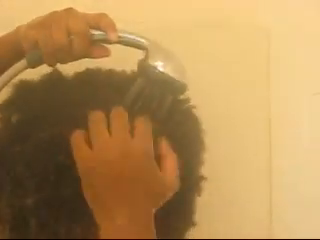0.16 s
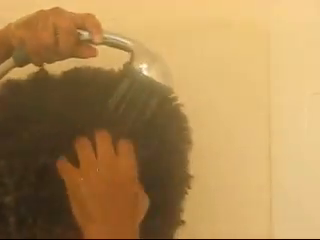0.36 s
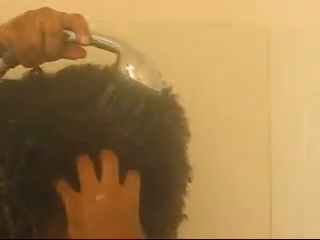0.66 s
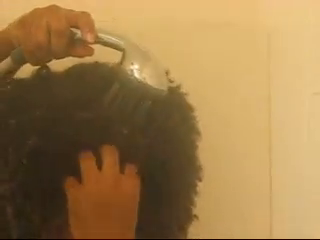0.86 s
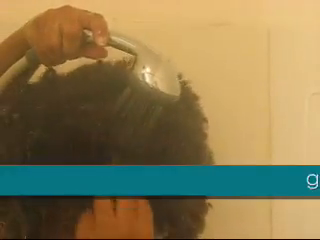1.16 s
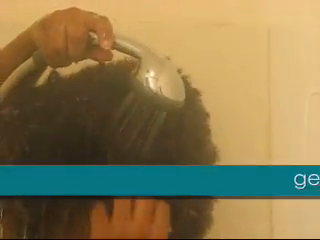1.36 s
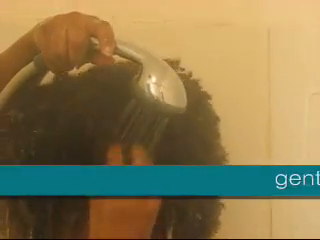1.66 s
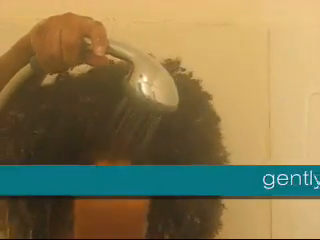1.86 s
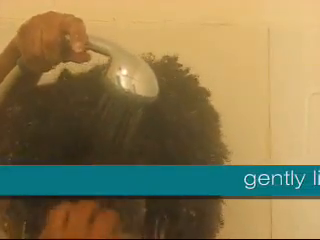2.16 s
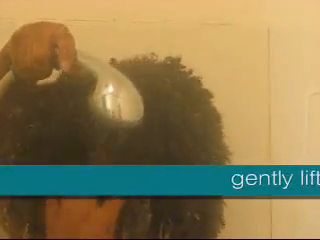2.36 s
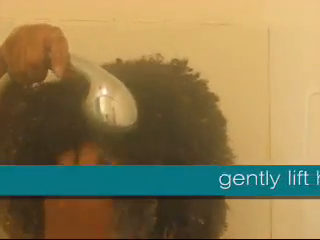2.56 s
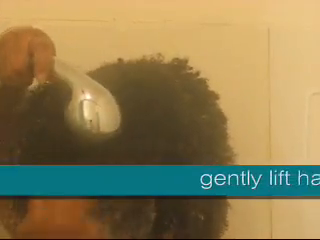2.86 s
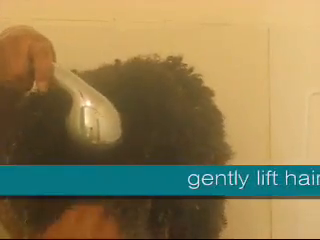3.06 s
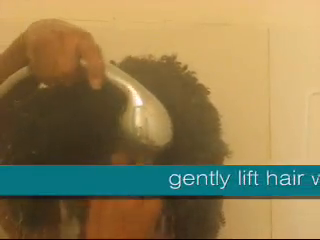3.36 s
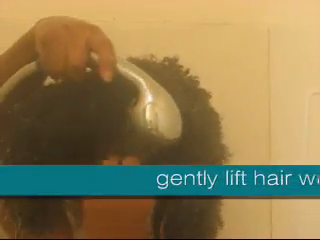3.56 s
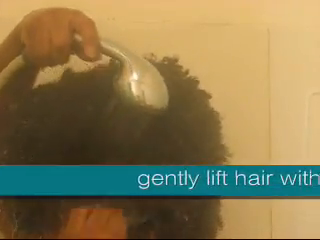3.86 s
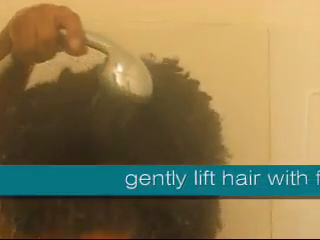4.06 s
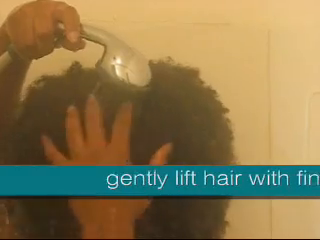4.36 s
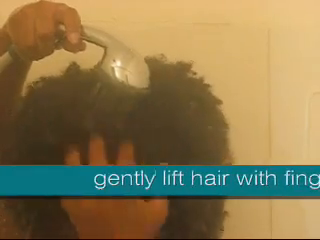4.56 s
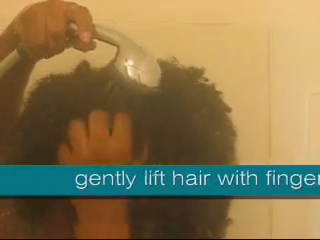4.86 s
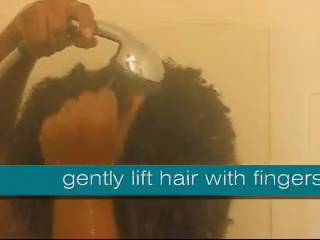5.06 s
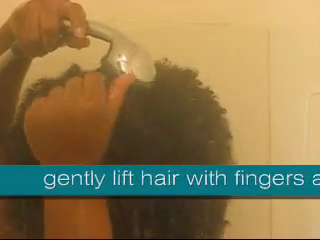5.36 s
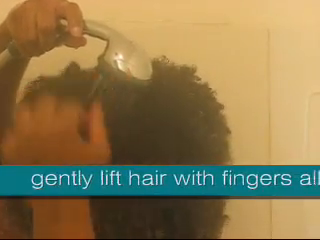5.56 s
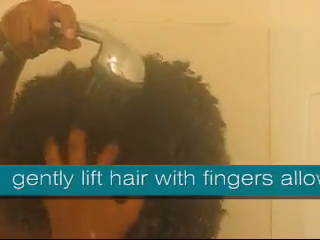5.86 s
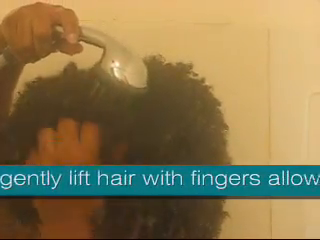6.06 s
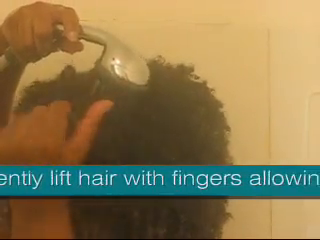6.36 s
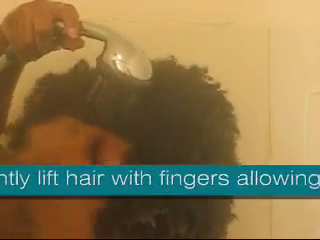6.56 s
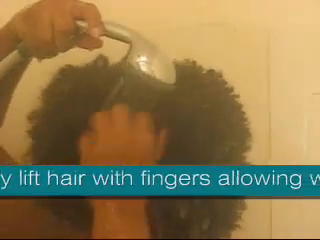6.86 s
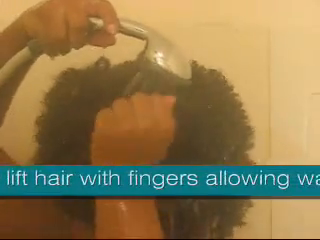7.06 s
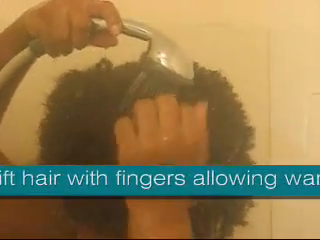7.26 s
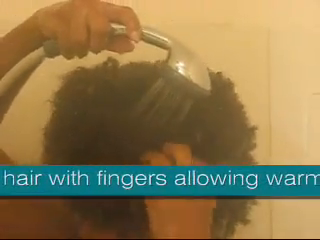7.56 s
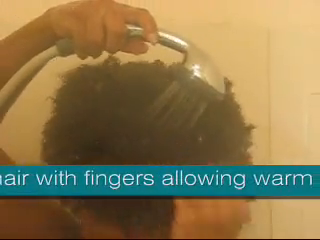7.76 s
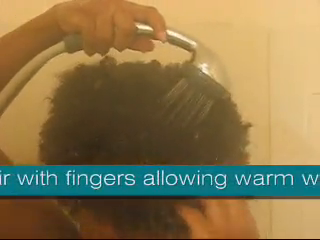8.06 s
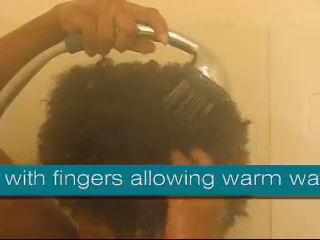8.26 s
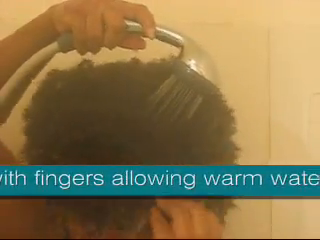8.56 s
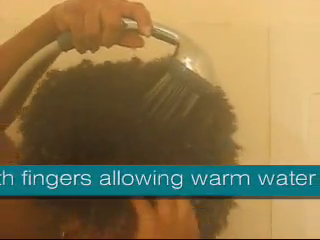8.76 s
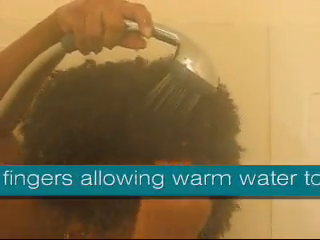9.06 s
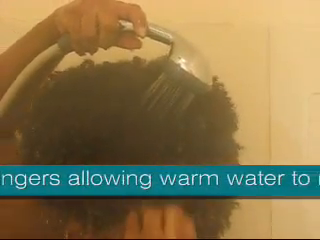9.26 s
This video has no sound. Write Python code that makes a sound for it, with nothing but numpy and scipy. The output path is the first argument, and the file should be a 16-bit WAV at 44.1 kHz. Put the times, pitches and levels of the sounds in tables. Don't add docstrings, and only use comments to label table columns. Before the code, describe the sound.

In a small tiled bathroom, a handheld shower sprays steadily into thick hair. Runoff patters and falls in crisp, irregular splats onto a tub that drums softly underneath. It starts splashy, thins to trickles, surges into dense splashing, eases around six seconds, then bursts again. A small close microphone overloads slightly on the loudest splats, with dull treble and soft bumps near the end.

```python
import sys
import numpy as np
from scipy import signal
from scipy.fft import rfft, irfft, next_fast_len
from scipy.io import wavfile
from scipy.ndimage import uniform_filter1d

SR = 44100
rng = np.random.default_rng(int(sys.argv[2]) if len(sys.argv) > 2 else 0)


def log_audio(samples):
    frames = np.atleast_2d(samples).T
    limited = np.clip(frames, -1, 1)
    pcm = np.round(limited * 32767).astype(np.int16)
    wavfile.write(sys.argv[1], SR, pcm)


def rack_gain(trim_db):
    fader = np.asarray(trim_db, float)
    return 10 ** (fader / 20)


N = 414423
SPOTS = 5


def unit(x):
    return x / np.sqrt(np.mean(x ** 2) + 1e-20)


def in_time(rows):
    s, *columns = np.transpose(rows)
    return [np.interp(np.arange(N) / SR, s, column) for column in columns]


def at_hz(points, hz):
    known_hz, values = np.array(points).T[:2]
    return np.interp(np.log(np.maximum(hz, 1)), np.log(known_hz), values)


def colour(x, gain_of_hz):
    size = next_fast_len(x.shape[-1])
    hz = np.arange(size // 2 + 1) * SR / size
    return irfft(rfft(x, size) * gain_of_hz(hz), size)[..., :x.shape[-1]]


def resonance(x, hz, width_hz):
    r = np.exp(-np.pi * width_hz / SR)
    gain = (1 - r * r) / 2
    return signal.lfilter([gain, 0, -gain], [1, -2 * r * np.cos(2 * np.pi * hz / SR), r * r], x)


def drift(rate_hz):
    r = np.exp(-80 * np.pi * rate_hz / SR)
    slow = signal.lfilter([1], [1, -2 * r, r * r], rng.standard_normal(N // 40 + 2002))[2000:]
    return np.interp(np.arange(N) / 40, np.arange(len(slow)), unit(slow))


def stereo(mid, side):
    # frequency_hz, left_right_likeness
    coherence = [(60, 0.93), (300, 1), (700, 0.89), (1300, 0.55), (2300, 0.21), (3500, 0.45), (6000, 0.5)]
    alike = lambda hz: np.clip(at_hz(coherence, hz), 0, 1)
    mid = colour(mid, lambda hz: np.sqrt(.5 + .5 * alike(hz)))
    side = colour(side, lambda hz: np.sqrt(.5 - .5 * alike(hz)))
    return np.array([mid + side, mid - side])


def runoff():
    # time_s, flow_db, drop_weight_db
    flow_rows = [(0.0, -16.5, 4), (0.23, -16, -2), (0.6, -22, -1.5), (1.28, -26.5, 0.5), (1.54, -21, 2.5),
                 (1.75, -27, 0), (2.33, -23.5, 0), (2.88, -13.5, -2.5), (4.06, -13.5, -0.5),
                 (5.78, -19.5, -2.5), (5.99, -32, 4.5), (6.25, -27, 0), (6.67, -16.5, -2.5),
                 (7.64, -15, -1), (7.77, -18, -5), (8.64, -22, 0.5), (8.84, -17.5, -8.5), (9.4, -22, 1.5)]
    # peak_s, gain_db, length_s
    squeezes = [(0.218, 2.5, 0.23), (0.65, 1.5, 0.062), (2.1, -1, 0.051), (2.708, 3.5, 0.067),
                (3.08, 1, 0.19), (3.47, 0.5, 0.2), (3.882, -3.5, 0.063), (4.203, 2, 0.047),
                (4.455, 1, 0.061), (4.658, 2.5, 0.1), (5.252, -7, 0.047), (5.532, 3, 0.13),
                (6.455, 5, 0.087), (6.91, -0.5, 0.017), (7.393, 2.5, 0.046), (7.687, 5, .1),
                (7.92, -3, .05), (8.525, -2.5, 0.046), (8.635, 6.5, 0.048), (9.055, 5.5, 0.1),
                (9.347, 4, 0.12)]
    # mean_level_db, share of the flow's swing, share of the weight, share of a gush
    layers = [(-32, 0.12, .3, 1.1),
              (-26.5, 0.95, 2, 1.23),
              (-18, 0.94, 0.1, 0.92),
              (-23.5, 0.42, 0.32, 1)]
    flow_db, weight_db = in_time(flow_rows)
    t = np.arange(0, N + 64, 64) / SR
    gush_db = 0
    for s, db, length in squeezes:
        width = length * np.where(t < s, 0.57, 1)
        gush_db = gush_db + db * np.exp(-((t - s) / width) ** 2)
    gush_db = np.interp(np.arange(N) / SR, t, gush_db)
    return [db + swing * (flow_db - flow_db.mean()) + heavy * weight_db + surge * gush_db
            for db, swing, heavy, surge in layers]


def splats(trim_db, climb, attack_share, ragged_db):
    # start_s, level_db, pitch_hz, t60_s (limited
    gobs = [(.387, -10.5, 4130, .2), (1.4214, -10.5, 3490, 0.5), (1.924, -12.5, 2830, 0.6),
            (2.005, 2.5, 3166, 0.2), (2.238, -14, 4100, 0.6), (2.679, -4.5, 3105, 0.1),
            (2.744, -4.5, 3960, .15), (2.989, -5, 4190, .2), (3.228, -2, 3560, .4),
            (3.365, -2, 3516, -0.5), (3.797, -6, 4290, .15), (3.965, -0.5, 3934, 3),
            (4.041, -2, 3924, 0), (4.173, -2.5, 4196, 0.5), (4.837, -1.5, 3960, 0.5),
            (4.958, -5, 4210, 0.4), (5.355, -5, 2700, 0.5), (5.45, -6.5, 3630, .5),
            (5.516, -6, 2754, 0.7), (5.555, -2, 4175, 0.2), (6.46, -6, 3315, 2),
            (6.661, -5, 4210, 0.2), (6.762, -5, 2920, .3), (7.014, -12, 3050, -0.6),
            (8.227, -8.5, 3324, 0.4), (8.291, -9, 3930, 0), (8.898, -4.5, 4226, 0.8),
            (8.946, -3, 3090, 0.25), (8.975, -5.5, 2900, 0.25), (9.04, -4, 2410, 0.24),
            (.095, -1, 5160, 0.37), (0.275, -5.5, 5130, 0.41), (1.614, -8, 4940, 0.25),
                   (2.386, -9, 4510, 0.36), (2.645, -4.5, 4530, 0.29), (3.139, -4.5, 5250, 0.78),
                   (3.304, -1, 5110, 0.34), (3.723, -3.5, 5170, 0.1), (3.928, 1.5, 5120, 0.34),
                   (4.623, 0, 5250, .3), (4.763, -5, 4880, 0.14), (4.787, -3.5, 5420, .55),
                   (5.097, -4, 4910, 0.38), (5.466, -5.5, 5520, .4), (5.786, -9.5, 4480, .3),
                   (5.905, -10.5, 5620, 0.36), (6.475, -2.5, 5610, .59), (6.742, 1, 5745, 0.6),
                   (6.728, -3, 5320, .3), (6.942, -5, 4550, .3), (7.143, 2.5, 5360, 0.23),
                   (7.335, -3.5, 4824, 0.68), (7.52, -3.5, 5550, 0.36), (7.639, 0.5, 5570, 0.67),
                   (7.704, -1.5, 4830, 0.31), (7.969, -9.5, 5220, 0.27), (8.066, -10.5, 5040, 0.24),
                   (8.253, -3.5, 5230, 0.44), (8.664, -4, 5380, 0.33), (9.047, 1.5, 4500, 0.26),
                   (9.31, -6.5, 5310, 0.27),
            (.178, 1.5, 5840, 0.21), (.613, -11.5, 6360, 0.22), (.963, -8.5, 6940, 0.35),
                  (1.511, -8, 5920, .15), (1.661, -10.5, 6820, 0.31), (2.012, -2.5, 6990, 0.3),
                  (2.181, -7, 6500, 0.26), (2.419, -6, 6040, 0.38), (2.792, -5, 5870, 0.33),
                  (2.938, -4, 6400, 0.33), (2.989, 2.5, 6550, 0.25), (3.274, 0.5, 6840, .55),
                  (3.478, -1, 6730, .48), (3.763, 0, 5570, 0.14), (4.055, 1, 6910, 0.28),
                  (4.137, -0.5, 6770, .55), (4.334, 0.5, 5930, 0.42), (5.321, -12, 6030, 0.44),
                  (5.585, -3, 6190, 0.14), (5.646, -5.5, 6480, 0.11), (6.839, 0, 5920, 0.15),
                  (7.064, -4.5, 5910, 0.27), (7.115, -0.5, 6410, 0.34), (7.459, -1.5, 6010, 0.15),
                  (8.148, -6.5, 6360, 0.45), (8.602, -10, 5260, 0.23), (8.64, -3, 7410, 0.19),
                  (8.836, -8.5, 6920, 0.36), (9.015, -4.5, 7030, 0.65), (9.364, 0, 6550, 0.29)]
    # start_s, level_db, pitch_hz
    drip_rows = [(0.05, -22, 5700), (.13, -5, 4810), (.432, -10, 6900), (.685, -20, 5200),
                 (.819, -12, 6870), (.998, -17, 4200), (1.036, -11, 7350), (1.311, -16, 3830),
                 (1.366, -12, 6370), (1.585, -11, 4500), (1.701, -13.5, 6340), (1.97, -16, 4020),
                 (2.141, -13.5, 6400), (2.478, -9, 6940), (2.529, -13, 4770), (2.595, -8, 6400),
                 (3.17, -8.5, 5160), (3.559, -2, 7420), (3.627, -9, 5270), (3.899, -5.5, 5940),
                 (4.28, -9.5, 4150), (5.059, -14, 4860), (6.238, -14, 6370), (6.41, -10, 5300),
                 (6.989, -7, 5510), (7.364, -10, 6000), (7.899, -15, 4160), (8.194, -9, 5020),
                 (8.804, -17, 6470), (9.262, -7, 7030)]
    # start_s, level_db, pitch_hz, t60_s (limited
    further_gobs = [(1.215, -19.5, 3100, -0.2), (1.617, -14, 3900, .3), (3.43, -8, 3286, 3),
                    (3.52, -2, 3600, -0.47), (4.115, -7, 4330, 1), (4.2, -4, 6500, -0.9),
                    (4.24, -10, 4200, .4), (5.36, -2, 4800, 0.1), (6.945, -3.5, 6800, .2),
                    (7.97, -8, 3085, -0.3), (7.975, -7.5, 7520, 0.5), (8.031, -27, 3170, -1),
                    (8.81, -9, 6820, .2), (8.868, -8, 7140, .25), (6.789, -13, 2780, .4), (4.96, -8, 7580, 1),
                    (5.062, -12, 7200, 0.5), (5.098, -6.5, 7860, 0.5), (5.12, -8, 4700, 0),
                    (5.165, -9, 7280, -0.5), (8.197, -10, 7500, 1.3), (8.258, -8, 7320, 0.5),
                    (6.985, -11, 4290, .25), (.935, -14, 4820, 0), (1.165, -16, 5200, .2),
                    (7.79, -11, 6020, 0)]
    # start_s, level_db, pitch_hz
    slap_rows = [(0.185, 3, 4510), (0.281, -2, 4200), (1.4217, 1.5, 3480), (1.6182, -1, 5260),
                 (1.6641, -5, 6170), (3.147, -4, 4480), (3.2326, 7, 4640), (3.4885, 4, 7000),
                 (3.8026, 3, 4640), (4.044, 4, 4180), (4.3358, 4, 6080), (4.7636, -2, 4870),
                 (4.8355, 7, 5660), (4.9661, -2, 3550), (5.0983, 0, 5020), (5.3623, -3.5, 2510),
                 (5.4734, 0, 6450), (5.5196, 7, 3450), (5.6494, -8, 6600), (6.6677, -0.5, 5820),
                 (6.7468, 6, 5180), (6.9496, 0, 4070), (7.0683, 0, 5860), (7.1404, 6, 5420),
                 (7.3682, 5, 5020), (7.71, 3, 4020), (7.7624, 3, 6660), (7.9714, 0.5, 7130),
                 (8.0691, -2, 6130), (8.1496, -1, 6000), (8.1953, 0, 6020), (8.2327, 6, 6640),
                 (8.2967, 0, 4420), (8.6047, -1, 5880), (8.6687, 4, 6280), (8.867, -1, 6600),
                 (8.9144, -3, 4080), (8.9535, 3.5, 3080), (8.9776, 5.5, 2910), (9.0193, -3, 6520),
                 (9.3127, 4.5, 7090)]
    drips = [(s, db, hz, 0.29) for s, db, hz in drip_rows]
    slaps = [(s - .0008, db - 6, hz, 0.074) for s, db, hz in slap_rows]
    out, t = np.zeros((2, N + SR)), np.arange(SR // 4) / SR
    mist_filter = signal.butter(2, 6500, "high", fs=SR, output="sos")
    for s, level_db, hz, t60 in gobs + drips + further_gobs + slaps:
        octaves = 0.8 + 0.28 * np.log2(hz / 5000) + 0.0048 * (level_db + 4.5)
        noise = rng.standard_normal((3, 2, len(t)))
        r = np.exp(-np.pi * 1.6 * hz * np.clip(octaves, .08, 1.5) * np.log(2) / SR)
        flutter = signal.lfilter([1], np.poly([r, r, r]), noise[0] + 1j * noise[1])
        pitch_hz = hz * (1 + climb * (1 - np.exp(-t / 0.02995)))
        body = unit(np.real(flutter * np.exp(2j * np.pi * np.cumsum(pitch_hz) / SR)))
        body = body + rack_gain(-6) * unit(signal.sosfilt(mist_filter, noise[0]))
        roughness = unit(uniform_filter1d(noise[2, 0], size=160))
        ragged = rack_gain(ragged_db * roughness * np.exp(-t / 0.095))
        t60 = np.clip(t60, .05, .6)
        attack = 1 - np.exp(-t / (attack_share * t60))
        fade = rack_gain(-60 * t / t60) * np.cos(2 * np.pi * t) * attack
        start = round(s * SR)
        out[:, start:start + len(t)] += rack_gain(level_db + trim_db) * body * ragged * fade
    return stereo(*out[:, :N])


def patter(level_db, low_hz, high_hz, per_s, spread_db, cycles):
    drop_db = np.clip(spread_db, 0, 4.5) * np.minimum(rng.exponential(1, N), 4)
    sizes = rack_gain(drop_db) * rng.choice([-1, 1], N)
    chance, dealt, out = rng.random(N), rng.integers(0, 2 * SPOTS, N), np.zeros((SPOTS, N))
    odds = [per_s * rack_gain(4 * drift(9)) / SR for spot in range(SPOTS)]
    for k, hz in enumerate(np.geomspace(low_hz, high_hz, 2 * SPOTS)):
        lands = (chance < odds[k // 2]) & (dealt == k)
        out[k % SPOTS] += unit(resonance(sizes * lands + 1e-18, hz, 2.18 * hz / cycles))
    return rack_gain(level_db) * unit(out) / np.sqrt(SPOTS)


def plinks():
    # start_s, level_db, pitch_hz, t60_s (limited below)
    lone_drops = [(.695, -17, 5200, -1), (1.935, -13, 2800, -0.7), (2.15, -21, 4650, .15),
                  (2.395, -14, 4260, -0.5), (2.535, -18, 4540, 0.5), (7.018, -12.5, 3070, 0),
                  (7.903, -16.5, 4300, .25), (8.068, -12.5, 4670, -0.5), (8.23, -10.5, 3470, 0.3),
                  (8.605, -13, 5600, -1.3), (8.84, -10.5, 7100, .15), (9.018, -12, 7000, .15)]
    out, t = np.zeros((2, N + SR)), np.arange(SR // 4) / SR
    for s, level_db, hz, t60 in lone_drops:
        width_hz = .14 * hz
        noise = rng.standard_normal((2, len(t)))
        ring = unit(resonance(resonance(noise, hz, width_hz), hz, width_hz))
        start = round(s * SR)
        out[:, start:start + len(t)] += rack_gain(level_db - 60 * t / np.clip(t60, .05, .4)) * ring
    return stereo(*out[:, :N])


def jets(patchy_db):
    # frequency_hz, density_db_per_hz
    hiss_spectrum = [(410, -14), (700, 7), (740, 9), (1310, 3.5), (2570, -15), (7140, 0.5), (8740, -2),
                     (9560, -6), (10200, -14), (13300, -44), (22000, -120)]
    hiss = colour(rng.standard_normal((2, N)), lambda hz: rack_gain(at_hz(hiss_spectrum, hz)))
    out = 0
    for centre in 700 * 2 ** np.arange(0, 4.1, .5):
        def region(hz):
            octaves = np.log2(np.clip(hz, 700, 11200) / centre)
            return np.cos(np.pi * np.clip(octaves, -.5, .5)) ** 2
        out = out + rack_gain(patchy_db * drift(4.2)) * colour(hiss, region)
    return rack_gain(-29.5 + drift(12.0)) * unit(stereo(*out))


def tub(level_db):
    # mode_hz, width_hz, level_db
    mode_rows = [(58.3, 12, -35), (75.7, 10.3, -10), (121, 20, -26), (139.8, 14.4, -5.5), (160.3, 11, -2),
                 (195, 35, -18.5), (219.2, 13.6, 0.5), (249.5, 14.7, 0), (283, 15.6, -1.5),
                 (315, 13.3, -7.5), (346.4, 17.7, -0.5), (373, 18.3, -4.5), (397.8, 14, -2),
                 (438, 18.3, -2.5), (463.7, 20, -5), (503.3, 17.3, -0.5), (552.5, 34, -8.5), (603, 42, -4),
                 (690, 30, -13), (742, 9.1, 1.5), (810, 346, -13.5)]
    # peak_s, level_db, centre_hz, length_s
    boom_rows = [
        (0.252, -28, 216, 0.21),
        (0.69, -33, 330, 0.11),
        (3.098, -30, 430, 0.11),
        (3.5, -39, 258, 0.13),
        (4.202, -31, 150, 0.073),
        (4.795, -54, 580, 0.13),
        (5.496, -37, 330, 0.18),
        (6.47, -29.5, 400, 0.092),
        (7.4, -34, 457, 0.08),
    ]

    def modes(f):
        peak = lambda hz, w: 1.5j * f * w / (hz ** 2 - f ** 2 + 1.5j * f * w)
        return sum(rack_gain(db) * peak(hz, w) ** 2 * (-1) ** k for k, (hz, w, db) in enumerate(mode_rows))

    drum = unit(stereo(*colour(rng.standard_normal((2, N)), modes)))
    out, t = rack_gain(level_db) * drum, np.arange(N) / SR
    for s, db, hz, length in boom_rows:
        near = slice(max(0, int((s - 3 * length) * SR)), int((s + 3 * length) * SR))
        swell = np.exp(-((t[near] - s) / length) ** 2)
        out[:, near] += rack_gain(db) * unit(resonance(drum[:, near], hz, .4 * hz)) * swell
    return out


def tiles(x, direct_db, build_s):
    # frequency_hz, t60_s
    decay_times = [(300, 0.71), (2000, 0.31), (5000, 0.22), (9000, 0.064)]
    t, edges, tail = np.arange(SR // 2) / SR, 400 * 2 ** np.arange(0, 5.1, .5), 0
    for low, high in zip(edges, edges[1:]):
        white = rng.standard_normal((2, SPOTS, len(t)))
        band = signal.sosfilt(signal.butter(2, [low, high], "band", fs=SR, output="sos"), white)
        t60 = at_hz(decay_times, np.sqrt(low * high))
        early = (1 + 0.66 * np.exp(-t / 0.0072)) * (1 - np.exp(-t / build_s))
        tail = tail + band * rack_gain(-60 * t / t60) * early / np.sqrt(t60)
    tail = tail / np.sqrt(np.sum(tail ** 2, axis=2, keepdims=True))
    tail[..., 0] += rack_gain(direct_db)
    x = np.hstack([x[:, SR // 4:0:-1], x])
    size = next_fast_len(x.shape[1] + len(t))
    wet = irfft(np.sum(rfft(x, size) * rfft(tail, size), axis=1), size)
    return stereo(*wet[:, SR // 4:SR // 4 + N])


def handling():
    # time_s, level_db
    rumble_rows = [
        (8.65, -71),
        (8.8, -34),
        (9.0, -26.5),
        (9.2, -41.5),
        (9.4, -45),
    ]
    # centre_s, peak_db, pitch_hz
    bump_rows = [
        (8.96, -22.5, 91),
        (9.347, -18, 97.5),
    ]
    band = signal.butter(2, [40, 95], "band", fs=SR, output="sos")
    low = signal.sosfilt(band, rng.standard_normal((2, N)))
    shake = resonance(resonance(rng.standard_normal((2, N)), 22, 19), 22, 19)
    t = np.arange(N) / SR
    bumps = sum(rack_gain(db) * np.sin(2 * np.pi * hz * (t - s)) * np.exp(-((t - s) / 0.014) ** 2)
                for s, db, hz in bump_rows)
    rumble = rack_gain(in_time(rumble_rows)[0]) * unit(stereo(*low))
    return rumble + rack_gain(-51.0) * unit(stereo(*shake)) + bumps


def joint_stereo(x):
    open_starts = [.97, 1.05, 1.12, 1.97, 2.55, 2.73, 3.05, 3.84, 4.26, 5.51, 6.4, 6.87, 7.38, 8.26]
    # start_s, length_s, edge_hz
    narrow_spans = [
        (1.51, .06, 3000),
        (4.39, .62, 2750),
        (5.96, .12, 500),
        (6.08, .1, 2000),
        (8.43, .1, 2700),
        (9.36, .1, 3000),
    ]
    # frequency_hz, readiness to drop a band
    hole_readiness = [(150, 1.3), (500, 1.6), (750, .2), (1500, .35), (2200, .1), (3000, -1.5)]
    hz, s, side = signal.stft((x[0] - x[1]) / 2, SR, nperseg=2048)
    edge_hz = np.full(len(s), 4000)
    for start, length, edge in narrow_spans + [(start, .085, SR) for start in open_starts]:
        edge_hz[(s >= start) & (s < start + length)] = edge
    worth = rng.standard_normal((len(hz) // 4 + 1, len(s))) + .7 * rng.standard_normal(len(s))
    worth = np.repeat(unit(uniform_filter1d(worth, size=6)), 4, axis=0)[:len(hz)]
    worthy = worth > at_hz(hole_readiness, hz)[:, None]
    kept = (hz[:, None] < edge_hz) & (worthy | (edge_hz == SR))
    side = signal.istft(side * kept, SR, nperseg=2048)[1][:N]
    return x.mean(0) + side * [[1], [-1]]


def top_edge(x):
    # start_s, length_s, edge_hz
    lifts = [(.17, .07, 11500), (.78, .07, 11300), (.93, .05, 11200), (1.47, .08, 11500), (2.0, .05, 11500),
             (2.98, .07, 11500), (3.18, .2, 11500), (3.46, .08, 11500), (4.13, .08, 11300),
             (6.72, .09, 11500), (7.1, .08, 11500), (7.48, .05, 11200), (7.62, .1, 11500),
             (9.28, .08, 11500)]
    hz, s, frames = signal.stft(x, SR, nperseg=2048)
    edge_hz = 10330 + 170 * unit(uniform_filter1d(rng.standard_normal(len(s)), size=3))
    for start, length, edge in lifts:
        edge_hz[(s >= start) & (s < start + length)] = edge
    return signal.istft(frames * (hz[:, None] < edge_hz), SR, nperseg=2048)[1][:, :N]


def scene():
    # low_hz, high_hz
    drop_ranges = [
        (1500, 2640),
        (3300, 5800),
        (5500, 15500),
    ]
    big_db, middle_db, fine_db, tub_db = runoff()
    drops = patter(big_db, *drop_ranges[0], per_s=400, spread_db=2.0, cycles=9.6)
    drops += patter(middle_db, *drop_ranges[1], per_s=1200, spread_db=3.0, cycles=8.4)
    drops += patter(fine_db, *drop_ranges[2], per_s=2500, spread_db=8.5, cycles=5.1)
    water = tiles(drops, direct_db=-5.0, build_s=0.00068) + jets(patchy_db=2.5) + plinks()
    water += splats(trim_db=-3.5, climb=.06, attack_share=0.02, ragged_db=2.2)

    def lean(hz):
        octaves = np.log2(np.maximum(hz, 1) / 2800)
        return rack_gain(2.5 / 2 * np.exp(-octaves ** 2) * [[-1], [1]])

    return colour(water, lean) + tub(tub_db) + handling()


def low_pass(x):
    return signal.sosfilt(signal.butter(12, 11600, fs=SR, output="sos"), x)


def record(dry):
    # frequency_hz, gain_db
    mic_response = [(2000, -1.5), (7000, 0), (8500, -3.5), (9300, -10), (9900, -17), (10400, -24.5),
                    (11600, -23)]
    picked_up = colour(dry, lambda hz: rack_gain(at_hz(mic_response, hz)))
    heard = top_edge(joint_stereo(picked_up))
    return low_pass(np.clip(heard, -1, 1))


dry = scene()
out = record(dry)
log_audio(out)
```